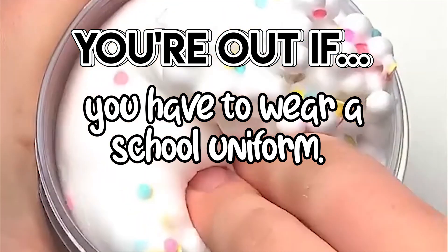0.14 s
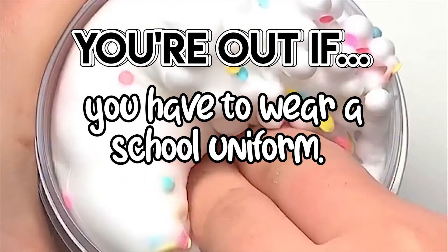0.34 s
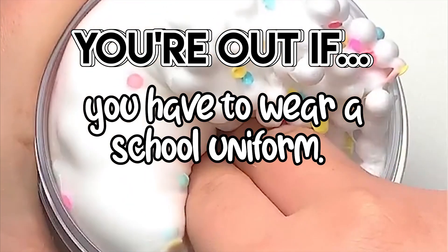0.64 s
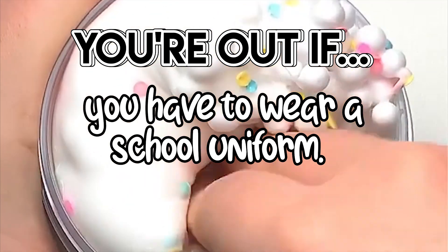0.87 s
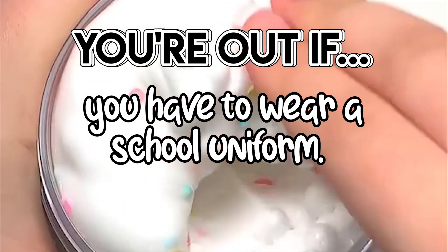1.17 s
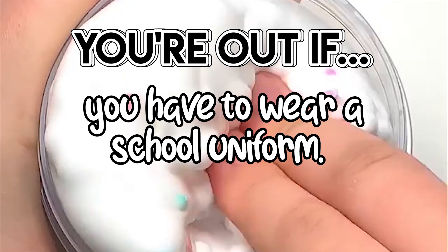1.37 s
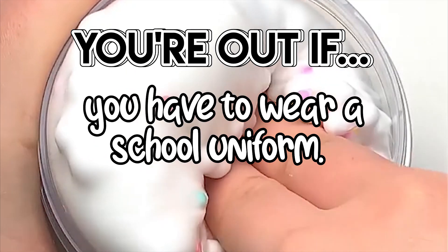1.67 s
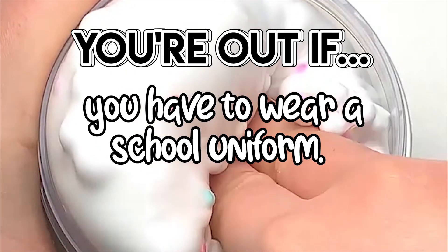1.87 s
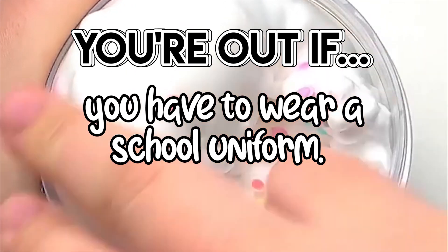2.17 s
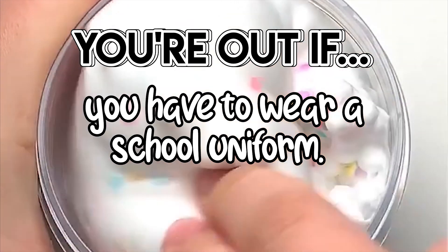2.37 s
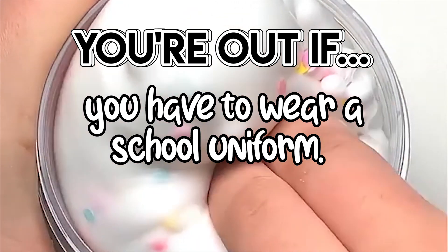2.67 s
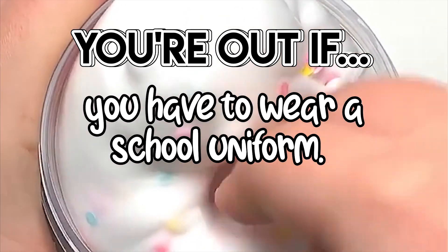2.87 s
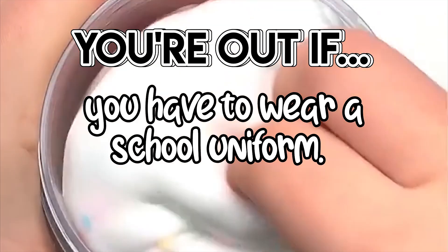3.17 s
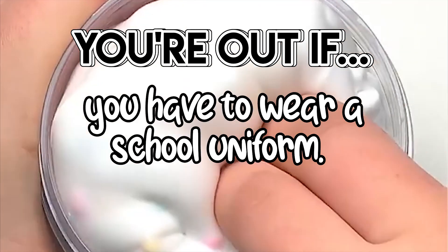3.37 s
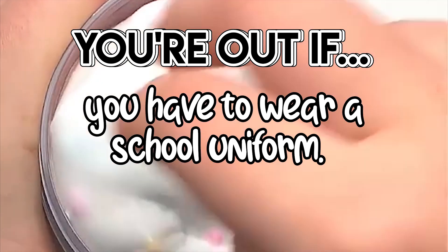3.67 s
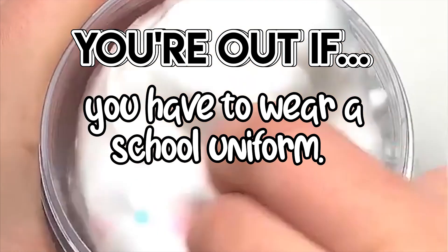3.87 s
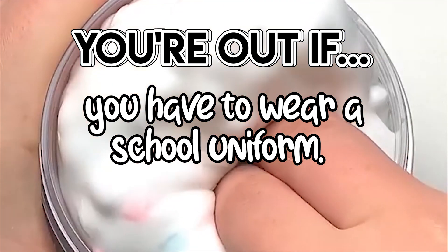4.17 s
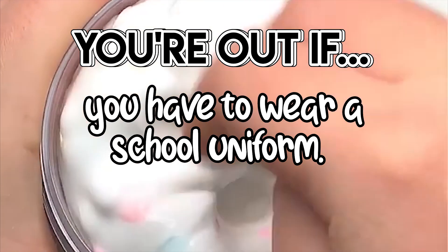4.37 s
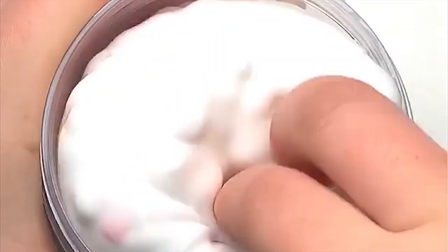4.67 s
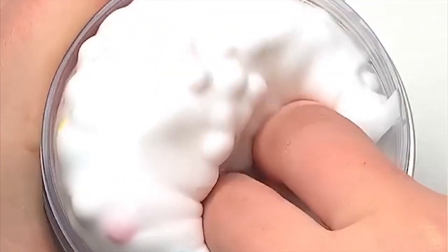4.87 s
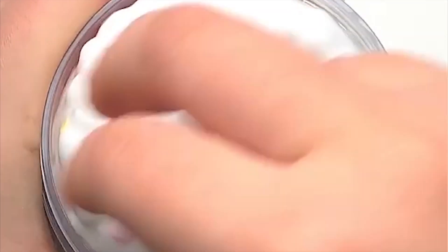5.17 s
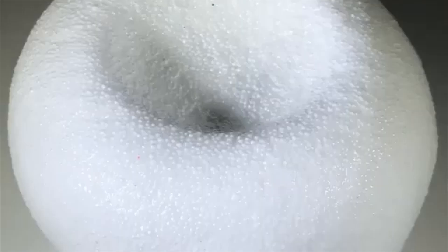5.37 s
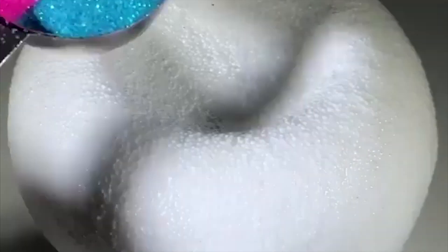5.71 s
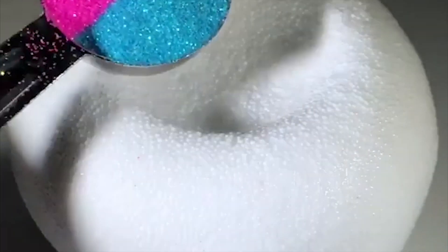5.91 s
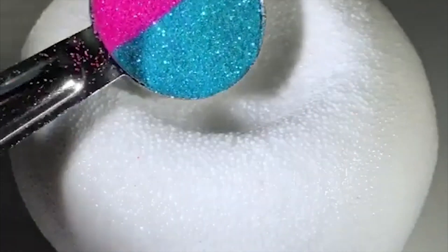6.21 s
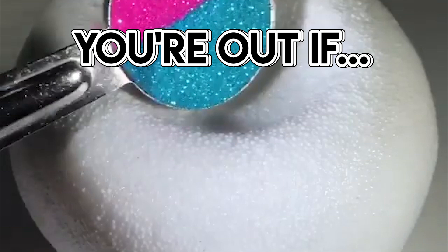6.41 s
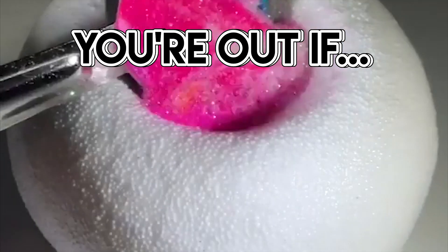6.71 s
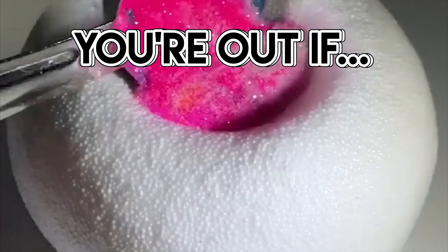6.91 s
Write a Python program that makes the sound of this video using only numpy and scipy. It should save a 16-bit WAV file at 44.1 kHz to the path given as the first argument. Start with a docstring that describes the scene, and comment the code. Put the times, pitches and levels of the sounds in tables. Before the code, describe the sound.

Close-up slime poking: fine foam crackle, sharp bubble pops, sticky suction snaps, glugs and low tub thumps, cutting to a very quiet humming room.

```python
"""Two fingers press into a plastic tub of foamy slime, close to the microphone, and pull out again six times.
Each press bursts bubbles, made as filtered clicks, and opens air pockets, made as short decaying tones.
Each pull is shaped noise: the seal snaps, the slime smears and lets go; the last four pulls also glug with air.
The tub rings, and drops on a table of decaying low tones, under a soft hiss and the rumble of the hand.
Near the end the sound switches to the faint, wavering hum of another, very quiet room."""
import sys
import numpy as np
from scipy import signal
from scipy.fft import rfft, irfft
from scipy.io import wavfile
from scipy.ndimage import uniform_filter1d

SR = 44100
rng = np.random.default_rng(int(sys.argv[2]) if len(sys.argv) > 2 else 0)


def dump_mix(stems):
    """Bounce the given channels to the path in sys.argv[1] as a 16-bit WAV at rate SR."""
    frames = np.atleast_2d(stems).T  # one column per channel
    limited = np.clip(frames, -1, 1)  # hard clip at full scale
    pcm = np.round(limited * 32767).astype(np.int16)
    wavfile.write(sys.argv[1], SR, pcm)


N = 310903
TIME = np.arange(N) / SR


def amp(db):
    """Decibels to gain."""
    return 10 ** (np.asarray(db) / 20)


def evened(x):
    """Scales to rms 1."""
    return x / np.sqrt(np.mean(x ** 2) + 1e-20)


def read(points, hz):
    """Reads a spectrum table on a log-frequency axis."""
    f, value = np.transpose(points)
    return np.interp(np.log(hz + 1), np.log(f + 1), value)


def add(mix, s, sound):
    """Mixes a sound in at time s."""
    part = mix[max(round(s * SR), 0):][:len(sound)]
    part += sound[:len(part)]


def through(x, response):
    """Convolves, keeping the length."""
    return signal.oaconvolve(x, response)[:len(x)]


def coloured(x, points):
    """Colours a full-length sound with a spectrum table."""
    return irfft(rfft(x) * amp(read(points, np.fft.rfftfreq(N, 1 / SR))), N)


def noise(points):
    """Steady noise of a given spectrum, rms 1."""
    return evened(coloured(rng.standard_normal(N), points))


def low_passed(x, edge_hz):
    """A steep band limit."""
    return signal.oaconvolve(x, signal.firwin(255, edge_hz, window=("kaiser", 8), fs=SR), "same")


def swell(s, rise_s, fall_s, hold_s=0):
    """An envelope that grows exponentially to 1 at time s, holds, and dies away."""
    rising = (TIME - s) / rise_s
    falling = (s + hold_s - TIME) / fall_s
    return np.exp(np.clip(np.minimum(rising, falling), -40, 0))


# faint rustles in the second room, before its fade: start_s [s], level_db [dB], decay_s [s]
RUSTLES = [(5.69, -75.5, .04), (5.87, -77, .27), (6.82, -89, 0.2)]
RUSTLE_RISE_S = 0.066


def rustle(grain_db=3):
    """Barely audible fine grains: bright noise whose level flickers."""
    bright = noise([(500, -14), (1500, -2.5), (3500, -1.5), (6000, -5.0), (11000, -3), (13800, -3), (14500, -50)])
    flicker_db = grain_db * noise([(20, 6.5), (300, -12), (1000, -50)])
    level = sum(amp(db) * swell(s, RUSTLE_RISE_S, decay_s) for s, db, decay_s in RUSTLES)
    return evened(bright * amp(flicker_db)) * level


# air of the second room, relative spectrum: pitch_hz [Hz], level_db [dB per Hz]
FAR_AIR = [(15, -67), (25, -58), (80, -15), (104, -7), (156, -5), (174, -6.5), (243, -5), (262, -10.5),
           (291, -1), (323, -6), (600, -6.5), (665, -8.5), (1340, -19), (12000, -38.5), (15600, -69.5),
           (22000, -120)]
# hum of the appliance, before the fade: pitch_hz [Hz], level_db [dB]
HUM = [(113.0, -76.5), (296.1, -74.5), (592.2, -78.5), (721.4, -84.5), (823.6, -83.5), (1653, -94),
       (1771, -89), (2713, -95)]
# how the second room fades in: time_s [s], gain_db [dB]
FAR_FADE = [(5.34, -65), (5.51, -30.5), (5.57, 1), (5.62, 3), (7.05, 3.5)]


def second_room(air_db=-67.5, waver_hz=2.06):
    """Soft air noise and the hum of an appliance, each tone wavering slowly in pitch, fading in."""
    waver = [(1, -2.0), (6, -5.0), (25, -24), (100, -120)]  # pitch_hz, level_db
    sound = amp(air_db) * noise(FAR_AIR) + rustle()
    for hz, db in HUM:
        pitch = hz + waver_hz * noise(waver)
        sound += amp(db) * np.sqrt(2) * np.sin(2 * np.pi * np.cumsum(pitch) / SR)
    return sound * amp(np.interp(TIME, *np.transpose(FAR_FADE)))


# steady hiss by the tub, relative spectrum: pitch_hz [Hz], level_db [dB per Hz]
NEAR_HISS = [(60, 0), (160, -1.5), (210, 0.5), (290, -1), (560, -6.5), (790, -7), (1500, -11.5),
             (2600, -16), (3300, -19), (10500, -22), (12500, -27.5)]
# rumble of the table under the hand, relative spectrum: pitch_hz [Hz], level_db [dB per Hz]
RUMBLE = [(10, -23), (22, 6.5), (43, 1.5), (62, -11.5), (85, -11.5), (115, -19.5), (200, -24.5),
          (400, -65.5)]
NEAR_DB = -54
# the resting hand shakes the table a little, and more as it swings back after each pull
SHAKE_DB, SWING_DB, SWING_AFTER_S, SWING_RISE_S, SWING_FALL_S = -40, -35, 0.29, 0.18, 0.076


def handling(crush_db, rub_db=-27, follow=0.51):
    """Rumble of the hand and steady hiss, with a dull rubbing that grows as the fingers press."""
    rub = noise([(50, -16), (130, 0.0), (320, -4), (900, -12.0), (1600, -34.5), (4000, -61.5)])
    swing = sum(swell(s + SWING_AFTER_S, SWING_RISE_S, SWING_FALL_S) for s, *_ in PULLS)
    rumble = noise(RUMBLE) * np.hypot(amp(SHAKE_DB), amp(SWING_DB) * swing)
    return rumble + amp(NEAR_DB) * noise(NEAR_HISS) + rub * amp(rub_db + follow * crush_db)


# the lifted tub drops back on the table and bounces once:
# start_s [s], peak_db [dB], push_s [s], bounce_db [dB relative to the drop]
JOLTS = [(0.993, -17, 0.0077, -20), (2.151, -23.5, 0.013, -1.5), (2.995, -12, 0.0079, -6.5),
         (3.693, -14.5, .0047, -2), (4.458, -5.5, 0.0097, -7.5), (5.183, -11.5, 0.0082, -3)]
# the table under the tub: pitch_hz [Hz], level_db [dB, relative], t60_s [s]
TABLE_MODES = [(42.4, 4, 0.054), (56.3, -10.5, 0.068), (86, -4.5, 0.1772), (117.7, 3, 0.19),
               (134.8, -2.5, 0.36), (170.5, 1, .1)]
BOUNCE_S, BOUNCE_PUSH_S = .039, .012
# each snap tugs at the tub, and the fingers nudge it as they land just before a press
TUG_DB, TUG_PUSH_S, TUG_AHEAD_S = -21.5, 0.0089, 0.0061
LAND_DB, LAND_PUSH_S, LAND_AHEAD_S = -32.5, 0.0149, .095


def jolts():
    """Soft pushes set the table ringing in its low modes; a longer push is duller."""
    out, t = np.zeros(N), np.arange(SR // 2) / SR
    ring = sum(amp(db - 60 * t / t60) * np.cos(2 * np.pi * hz * t) for hz, db, t60 in TABLE_MODES)
    # every push: start_s, peak_db, push_s
    pushes = [(s - LAND_AHEAD_S, LAND_DB, LAND_PUSH_S) for s, *_ in PRESSES]
    pushes += [(s - TUG_AHEAD_S, TUG_DB, TUG_PUSH_S) for s, *_ in PULLS]
    for s, db, push_s, bounce_db in JOLTS:
        pushes += [(s, db, push_s), (s + BOUNCE_S, db + bounce_db, BOUNCE_PUSH_S)]
    for s, db, push_s in pushes:
        push = np.sin(np.pi * np.minimum(t / push_s, 1)) ** 2
        thud = through(ring, push)
        add(out, s, amp(db) * thud / abs(thud).max())
    return out


def room(x, wet_db=-15, low_t60=0.16, high_t60=0.15, treble_db=-6, first_s=0.003):
    """A small, dry room: a weak tail of decaying noise whose treble dies first."""
    hz, t, z = signal.stft(rng.standard_normal(SR // 2), SR, nperseg=256)
    t60 = read([(1500, low_t60), (8000, high_t60)], hz)[:, None]
    tail = signal.istft(z * amp(-60 * t / t60), SR, nperseg=256)[1]
    tail[:round(first_s * SR)] = 0
    tilt = amp(read([(2500, 0), (7000, treble_db)], np.fft.rfftfreq(len(tail), 1 / SR)))
    tail = irfft(rfft(tail / np.linalg.norm(tail)) * tilt)
    return x + through(x, tail * amp(wet_db))


# the ringing tub: pitch_hz [Hz], gain_db [dB], t60_s [s]
TUB_MODES = [(273, -3.5, 0.11), (534.7, 0, 0.069), (717, -1, 0.39), (798, -11.5, 0.37), (984, -4, 0.06),
             (1245, -15.5, 0.395), (1980, -4.5, 0.043), (2137, 0, 0.017), (2910, -12, .14),
             (2668, -22.5, 0.21), (3665, -9.5, 0.017), (4700, -6, 0.043), (7000, 0, .05)]


def tub(x):
    """The plastic walls ring on after each sound, as decaying modes."""
    t, ring = np.arange(SR // 2) / SR, 0
    for hz, db, t60 in TUB_MODES:
        per_sample = 2 * np.log(1000) / (t60 * SR)  # keeps the gain at the mode whatever its decay
        ring = ring + amp(db - 60 * t / t60) * np.sin(2 * np.pi * hz * t) * per_sample
    return x + through(x, ring)


# echoes off the rim, the hand and the table: delay_s [s], gain [linear]
ECHOES = [(.0005, 0.078), (.0026, 0.095), (.0039, .17), (.0073, 0.053)]


def echoed(x):
    """Close surfaces send each sound back within a few milliseconds."""
    out = x.copy()
    for delay_s, gain in ECHOES:
        add(out, delay_s, gain * x)
    return out


# colour of the hollow in the tub: pitch_hz [Hz], gain_db [dB]
HOLLOW = [(200, 4), (290, 15.5), (600, 4.5), (780, 10.5), (900, 1), (1220, 5.5), (1480, -8), (2000, 1.5),
          (2650, 4.5), (3100, -4.5), (3700, -1.5), (4500, -1.5), (5600, 0.5), (6600, 2), (8000, 1)]


def in_hollow(shape_db, size=2048):
    """Causal (minimum-phase) response of a source of spectrum shape_db(hz), heard from the hollow of the tub."""
    hz = abs(np.fft.fftfreq(size, 1 / SR))
    log_gain = np.log(amp(np.maximum(shape_db(hz) + read(HOLLOW, hz), -90)))
    return np.fft.ifft(np.exp(np.conj(signal.hilbert(log_gain)))).real[:size // 2]


# the fingers bite through the skin of the slime, then push deeper and relax:
# start_s [s], bite_db [dB], bite_s [s], hardest_after_s [s], push_db [dB], swell_s [s], relax_s [s]
PRESSES = [(0.1, -54, 0.062, 0.21, -54, 0.67, 0.27), (1.339, -35, 0.018, 0.075, -48.5, 0.13, 0.28),
           (2.411, -52.5, 0.013, 0.28, -56, 0.26, 0.17), (3.264, -57, 0.042, 0.26, -62, 0.6, 0.13),
           (3.979, -50.5, 0.028, .185, -59.5, 0.27, 0.12), (4.688, -47.5, 0.027, 0.2, -56, 0.18, 0.093)]


def crushing(rest_db=-75):
    """How hard the foam is being crushed, in dB: a quick bite and a slow push for each press."""
    power = amp(rest_db) ** 2
    for s, bite_db, bite_s, after_s, push_db, swell_s, relax_s in PRESSES:
        bite = amp(bite_db) * swell(s, bite_s, bite_s)
        push = amp(push_db) * swell(s + after_s, swell_s, relax_s)
        power = power + bite ** 2 + push ** 2
    return 10 * np.log10(power)


def blips(low_hz, high_hz, per_s, cycles, glide, spread_db, count=24, size=2048):
    """Air cells ring for a few cycles each, rising in pitch as they open. Rms 1."""
    out, t = np.zeros(N), np.arange(size) / SR
    for hz in np.geomspace(low_hz, high_hz, count):
        age = t * hz / cycles
        pitch = hz * (1 + glide * np.tanh(age))
        ring = np.sin(2 * np.pi * np.cumsum(pitch) / SR) * np.exp(-age) * (1 - np.exp(-t * hz))
        sizes = amp(spread_db * np.minimum(rng.exponential(1, N), 3))
        starts = rng.random(N) < per_s / count / SR
        out += through(sizes * starts, ring * np.sqrt(hz))
    return evened(out)


def squish(crush_db, wet_db=-25, fizz_db=-3, follow=.7):
    """Large wet cells gurgle even under light pressure; small ones fizz as the crushing grows."""
    wet = blips(low_hz=310, high_hz=1300, per_s=220, cycles=1.3, glide=0.038, spread_db=5.5)
    fizz = blips(low_hz=2300, high_hz=4900, per_s=700, cycles=3, glide=.04, spread_db=4.5)
    return wet * amp(wet_db + follow * crush_db) + fizz * amp(fizz_db + crush_db)


def bubble(hz, octaves, scatter=0.29, scatter_s=0.0016, skirt_db=26.91, size=1024):
    """A film snaps; the click rattles briefly between fingers and slime. Energy 1."""
    t = np.arange(size) / SR
    click = scatter * rng.standard_normal(size) * np.exp(-t / scatter_s)
    click[0] = rng.choice([-1, 1])

    def hump_db(f):
        return -skirt_db * np.log10(1 + (np.log2((f + 1) / hz) / octaves) ** 2)
    sound = through(click, in_hollow(hump_db))
    return sound / np.linalg.norm(sound)


# bursting foam cells, relative spectrum: pitch_hz [Hz], gain_db [dB]
FOAM = [(100, -25.5), (400, -2.5), (1000, -1), (2200, 0.5), (5000, -1), (11000, 0), (13000, -26.5)]


def crackle(crush_db, per_s=1300, spread_db=2.5, level_db=-1, octaves=1.09, count=20):
    """Countless tiny foam cells of many sizes burst under the fingers."""
    out = np.zeros(N)
    for hz in np.geomspace(900, 10000, count):
        sizes = amp(spread_db * np.minimum(rng.exponential(1, N), 4))
        bursts = rng.random(N) < per_s / count / SR
        out += through(sizes * bursts, bubble(hz, octaves)) * np.sqrt(hz)
    return evened(coloured(out, FOAM)) * amp(crush_db + level_db)


def small_pops(crush_db, level_db=-24.5, spread_db=2, busy_db=-53, rate_law=1.9, follow=0.27,
               centre_hz=2500, scatter_octaves=1.28, octaves=1.0, count=260):
    """Middling bubbles burst at random, more often and louder as the crushing grows."""
    out = np.zeros(N)
    for k, (when, chance, size, pitch) in enumerate(rng.random((count, 4))):
        s = (k + when) / count * SWITCH_S
        effort_db = crush_db[round(s * SR)] - busy_db
        if chance < amp(rate_law * effort_db):
            sound = bubble(centre_hz * 2 ** (scatter_octaves * (2 * pitch - 1)), octaves)
            add(out, s, amp(level_db + follow * effort_db - spread_db * size) * sound)
    return out


# the larger bubbles bursting, before echoes, tub and room:
# start_s [s], level_db [dB over 5 ms], pitch_hz [centre, Hz], width_octaves [octaves]
POPS = [(0.047, -31.5, 4900, 2), (0.0883, -40, 2210, 1.4), (0.1157, -39, 1730, 2.5),
        (0.1884, -41.5, 1430, 3), (0.2316, -40.5, 3020, .8), (0.2668, -45, 2240, 2.9),
        (0.2915, -44, 890, 1.8), (0.3184, -39.5, 3580, 0.57), (0.3627, -43.5, 1850, 1.4),
        (0.4162, -44, 3740, 1.3), (0.436, -40.5, 2560, 2.2), (0.53, -43, 5740, 1.7),
        (0.6095, -38.5, 3300, 0.85), (0.699, -45.5, 3080, 0.42), (1.305, -35.5, 6600, 1),
        (1.314, -26.5, 4270, 0.98), (1.327, -30, 5240, 0.85), (1.3332, -22, 7300, 0.76),
        (1.34, -23, 4570, 0.38), (1.3644, -32.5, 2750, 1), (1.4388, -34, 3770, 0.59),
        (1.511, -38.5, 2860, 0.66), (1.558, -39, 2800, 3.1), (1.6118, -39.5, 3530, 2.4),
        (1.6485, -42.5, 2840, 1.3), (1.6685, -39.5, 5630, 0.91), (1.752, -39, 3300, 0.55),
        (1.7694, -34.5, 3820, 2), (1.8518, -36, 4000, 1.03), (2.5572, -39, 2900, 0.41),
        (2.6905, -31, 3600, 1.2), (2.75, -32, 2660, 0.93), (3.3436, -37, 2600, 0.77),
        (3.4725, -37, 970, 0.66), (3.9018, -40, 1170, 0.77), (3.977, -46, 3500, 4.4),
        (4.0083, -44, 1020, 0.65), (4.1754, -46, 1270, 2.3), (4.2742, -44, 1870, 1.04),
        (4.6911, -36.5, 2660, 10), (4.746, -43, 2800, 3), (4.7795, -39.5, 3550, 0.39),
        (4.9881, -39, 1440, 0.83)]


def pops(creak_db=-13, creak_s=0.0012, size=400):
    """The larger bubbles, one by one; each film creaks for a moment before it bursts."""
    out, span = np.zeros(N), np.sqrt(.005 * SR)  # span: rms over 5 ms to energy
    for s, db, hz, octaves in POPS:
        before_s = np.arange(size)[::-1] / SR
        creak = rng.standard_normal(size) * np.exp(-before_s / creak_s)
        burst = np.append(amp(creak_db) * creak / np.linalg.norm(creak), 1)
        add(out, s - size / SR, amp(db) * span * np.convolve(burst, bubble(hz, octaves)))
    return out


# an air pocket of 1 kHz dies in this time; smaller, higher ones die sooner
POCKET_DECAY_S, POCKET_SIZE_LAW = 0.0051, .48


def pocket(hz, opening_s=.0004, wobble=.06, sag=0.14, size=4096):
    """Air rings in a pocket whose soft walls keep moving; the pitch sags as it widens."""
    t = np.arange(size) / SR
    decay = POCKET_DECAY_S / (hz / 1000) ** POCKET_SIZE_LAW
    walls = evened(uniform_filter1d(rng.standard_normal(size), size=60))
    pitch = hz * (1 + wobble * walls - sag * np.tanh(t / decay / 2 - .5))
    return np.sin(2 * np.pi * np.cumsum(pitch) / SR) * np.exp(-t / decay) * (1 - np.exp(-t / opening_s))


# small air pockets plop open under the pressing fingers: start_s [s], level_db [dB], pitch_hz [Hz]
PLOPS = [(.120, -44, 1180), (.190, -38.5, 890), (.198, -43, 760), (.300, -47, 546), (1.772, -44, 1180),
         (2.75, -34, 335), (3.472, -34.5, 384), (3.966, -35.5, 287)]
# air glugs into the hole on the deeper pulls:
# start_s [s], level_db [dB], pitch_hz [Hz], octave_db [dB relative to the glug, ring an octave higher]
GLUGS = [(2.995, -17, 1940, -25), (3.6887, -14.5, 966, -18), (3.727, -23.5, 1830, -20),
         (4.4495, 1, 2330, -17), (5.189, -7, 2077, -2)]
# a weaker bubble runs ahead of each glug and another follows it
LEAD_S, LEAD_DB, TRAIL_S, TRAIL_DB = 0.0034, -12, .0088, -8
HOLE_HZ = 283


def pockets():
    """Presses open small pockets; a pull opens a large and a small one, then the hole; glugs are three bubbles."""
    out = np.zeros(N)
    for s, db, hz in PLOPS:
        add(out, s, amp(db) * pocket(hz))
    for s, *_, gulp_hz, gulp_db, squeak_hz, squeak_db, _, hold_s, _, _, hole_db in PULLS:
        add(out, s, amp(gulp_db) * pocket(gulp_hz))
        add(out, s, amp(squeak_db) * pocket(squeak_hz))
        add(out, s + hold_s, amp(hole_db) * pocket(HOLE_HZ))
    for s, db, hz, octave_db in GLUGS:
        add(out, s - LEAD_S, amp(db + LEAD_DB) * pocket(hz))
        add(out, s, amp(db) * (pocket(hz) + amp(octave_db) * pocket(2 * hz)))
        add(out, s + TRAIL_S, amp(db + TRAIL_DB) * pocket(hz))
    return out


# the fingers pull out: the seal snaps with a low gulp and a high squeak, the slime smears off the skin,
# then lets go and the finger hole rings: start_s [s], snap_db [dB], snap_rise_s [s], snap_fall_s [s],
# snap_crisp_db [dB], gulp_hz [Hz], gulp_db [dB], squeak_hz [Hz], squeak_db [dB], smear_db [dB],
# lets_go_after_s [s], release_db [dB], release_crisp_db [dB], hole_db [dB]
PULLS = [(0.9648, -14.5, 0.00064, 0.0019, 2, 725, -22.5, 3680, -15.5, -27.5, 0.023, -43, 2.5, -31.5),
         (2.092, -31, 0.011, 0.0035, -14.5, 367, -27.5, 2110, -42, -37.5, 0.0164, -33, -0.5, -40),
         (2.965, -21.5, 0.00083, 0.0031, 6.5, 739, -23.5, 3960, -20.5, -33.5, 0.028, -27, -4.5, -20.5),
         (3.6917, -13.5, 0.0029, 0.0011, -3.5, 594.4, -13.5, 4330, -7, -31, 0.027, -29.5, -2, -17),
         (4.424, -12.5, 0.00093, 0.0035, -0.5, 298, -15, 3860, -6, -30, 0.036, -11, -7, -19),
         (5.1766, -8, 0.00042, 0.0014, -5, 289.2, -8.5, 6180, -9, -29, 0.018, -22, 6.5, -22.5)]
# a finger slips during a press and tears a little slime: start_s [s], level_db [dB], rise_s [s], fall_s [s]
SLIPS = [(2.482, -41, 0.0049, .0028), (4.097, -34.5, 0.0017, 0.0016)]
# the three ranges of a tear, relative spectra: pitch_hz [Hz], gain_db [dB]
BODY = [(90, -31), (250, -2), (500, -2), (900, -4), (1200, -3), (1800, -26.5), (4000, -70)]
MIDDLE = [(500, -39.5), (1200, -6), (1900, -1.5), (2600, -1), (3600, -12), (8000, -53.5)]
CRISP = [(1000, -45), (2600, -6), (3600, 3.5), (6500, -4.5), (11000, -7.5), (13000, -31)]
# share of each range in a slip: body_db [dB], middle_db [dB], crisp_db [dB]
SLIP_DB = (-0.5, -4, 6)
# the same three shares in each stage of a pull
SNAP_DB, SMEAR_DB, RELEASE_DB = (-5.5, -5.5, 1), (-3.5, -12, -9), (0, -4, -6.5)
SMEAR_RISE_S, SMEAR_FALL_S = 0.0084, .022
RELEASE_RISE_S, RELEASE_FALL_S = 0.0059, 0.011


def tears(grain_db=6.0, steady_size=260):
    """Sticky threads part in a fast, grainy rush: a snap, a smear, and a last swell as the slime lets go."""
    out = np.zeros(N)
    for k, band in enumerate([BODY, MIDDLE, CRISP]):
        threads = rng.standard_normal(N) * amp(grain_db * rng.standard_normal(N))
        rush = through(threads, in_hollow(lambda f: read(band, f)))
        rush /= np.sqrt(abs(uniform_filter1d(rush ** 2, size=steady_size)) + 1e-12)  # the pull sets the level
        power, crisp = np.zeros(N), band is CRISP
        for (s, snap_db, rise_s, fall_s, snap_crisp_db, *_,
             smear_db, hold_s, release_db, release_crisp_db, _) in PULLS:
            snap_gain = amp(snap_db + SNAP_DB[k] + crisp * snap_crisp_db)
            smear_gain = amp(smear_db + SMEAR_DB[k])
            release_gain = amp(release_db + RELEASE_DB[k] + crisp * release_crisp_db)
            power += (snap_gain * swell(s, rise_s, fall_s)) ** 2
            power += (smear_gain * swell(s, SMEAR_RISE_S, SMEAR_FALL_S, hold_s)) ** 2
            power += (release_gain * swell(s + hold_s, RELEASE_RISE_S, RELEASE_FALL_S)) ** 2
        for s, db, rise_s, fall_s in SLIPS:
            power += (amp(db + SLIP_DB[k]) * swell(s, rise_s, fall_s)) ** 2
        out += rush * np.sqrt(power)
    return out


SWITCH_S = 5.345
SLIME_EDGE_HZ = 11950  # upper band limit of the slime scene


def scene():
    """The slime in its tub, close to the microphone, then the quiet room."""
    crush_db = crushing()
    foam = pops() + small_pops(crush_db) + crackle(crush_db) + squish(crush_db)
    in_tub = tub(echoed(foam + tears()) + pockets())
    slime = room(in_tub) + jolts() + handling(crush_db)
    first = np.clip((SWITCH_S - TIME) / .003, 0, 1)  # a 3 ms crossfade
    return (first * low_passed(slime, SLIME_EDGE_HZ) + (1 - first) * second_room())[None]


def record(dry, fizz_db=-9, fizz_hz=12500, edge_hz=15800):
    """The recorder clips the loudest peaks and dulls the topmost treble; then the band limit."""
    clipped = np.clip(dry[0], -.6, .6)
    body = low_passed(clipped, fizz_hz)
    fizz = clipped - body
    return low_passed(body + amp(fizz_db) * fizz, edge_hz)[None]


dry = scene()
out = record(dry)
dump_mix(out)
```